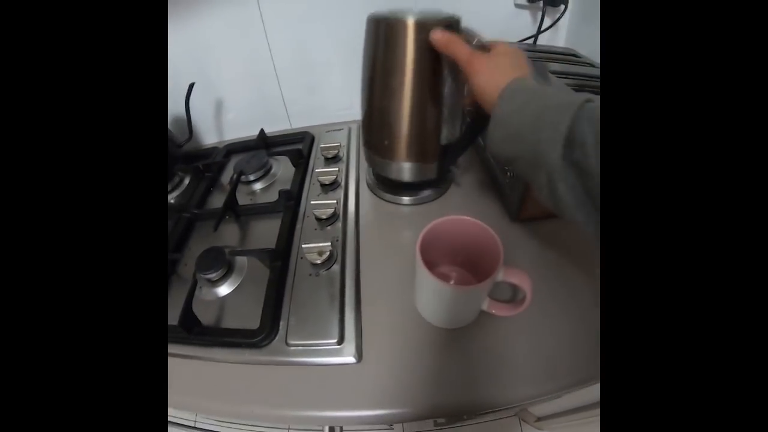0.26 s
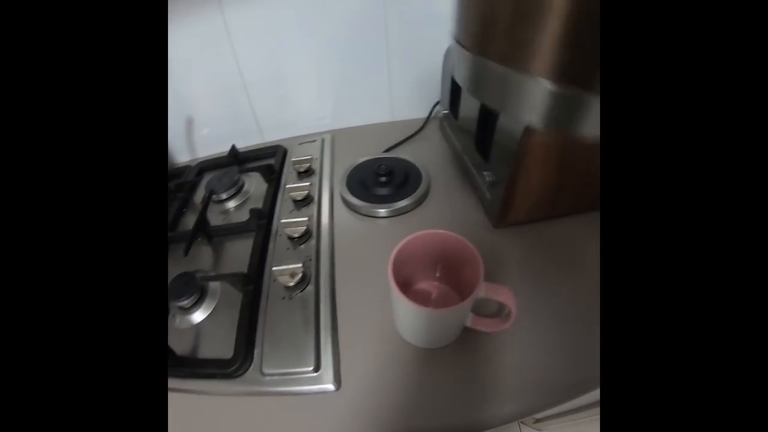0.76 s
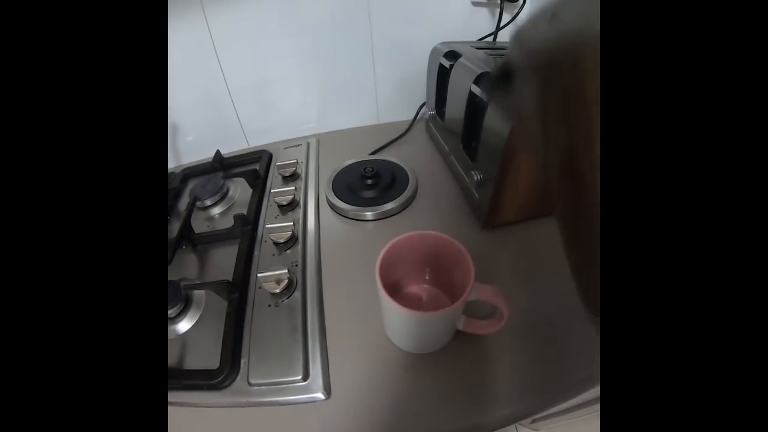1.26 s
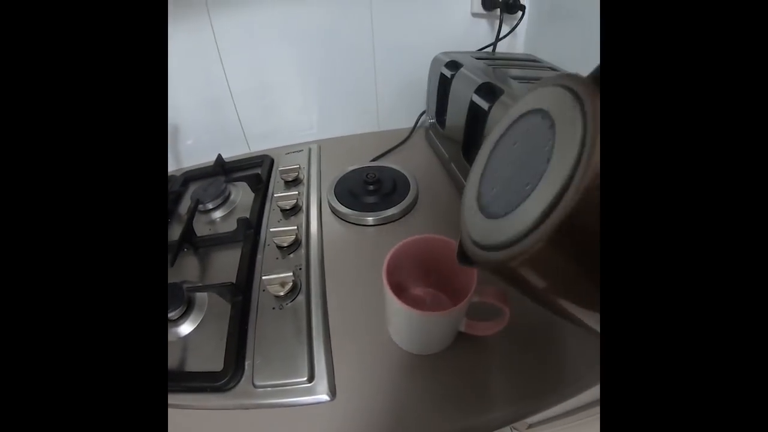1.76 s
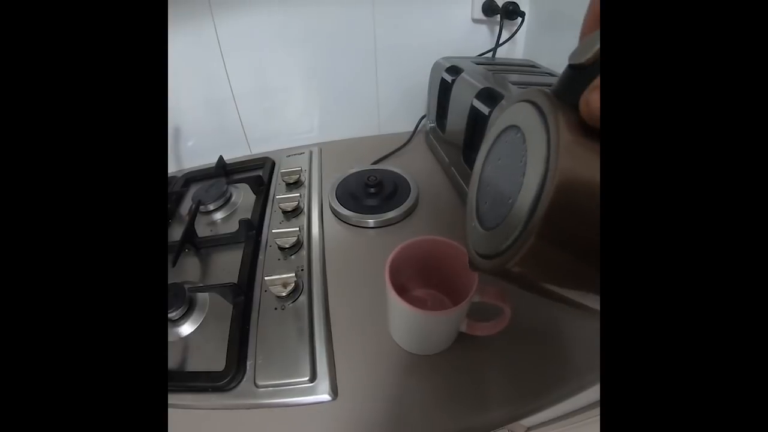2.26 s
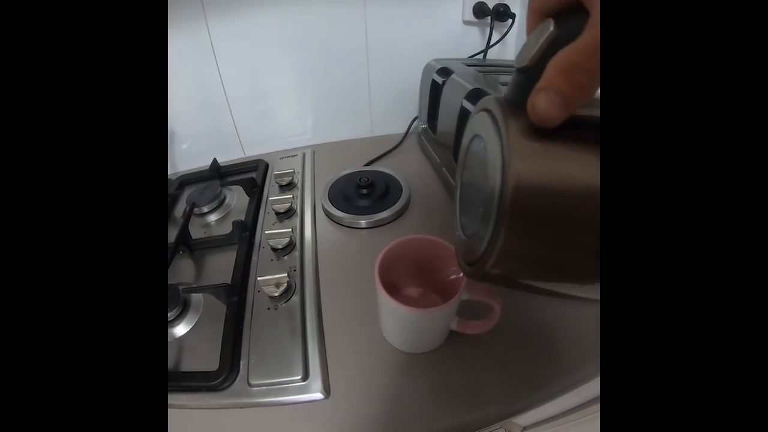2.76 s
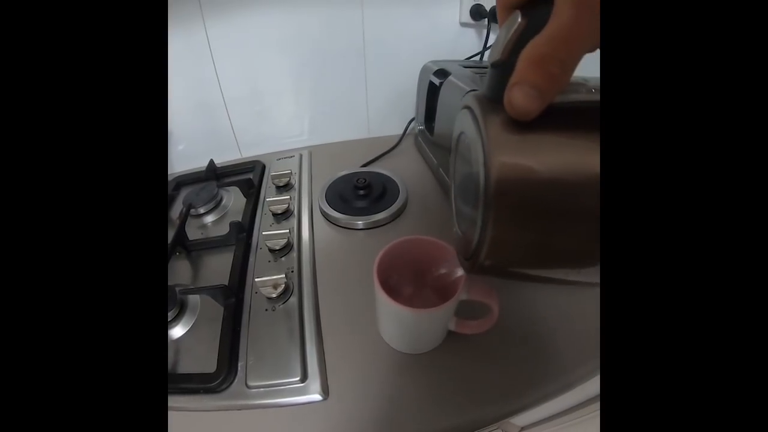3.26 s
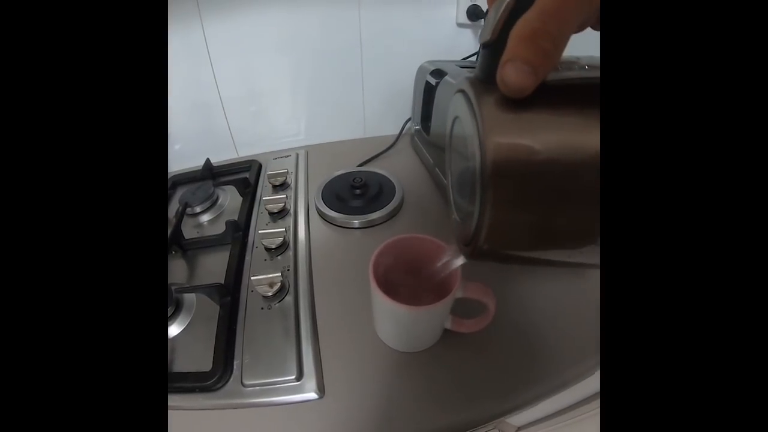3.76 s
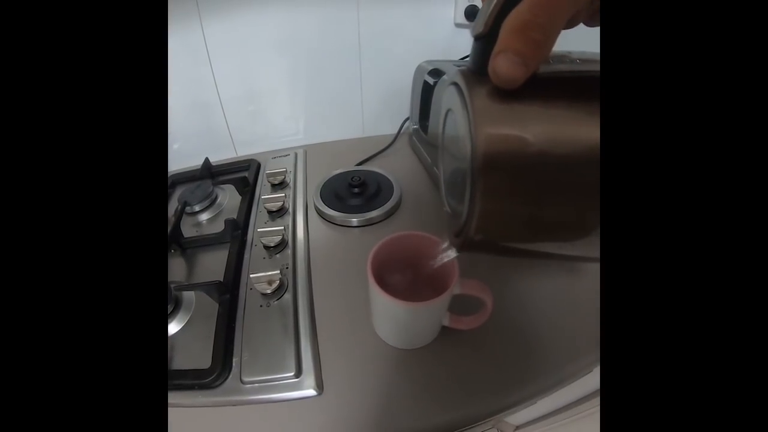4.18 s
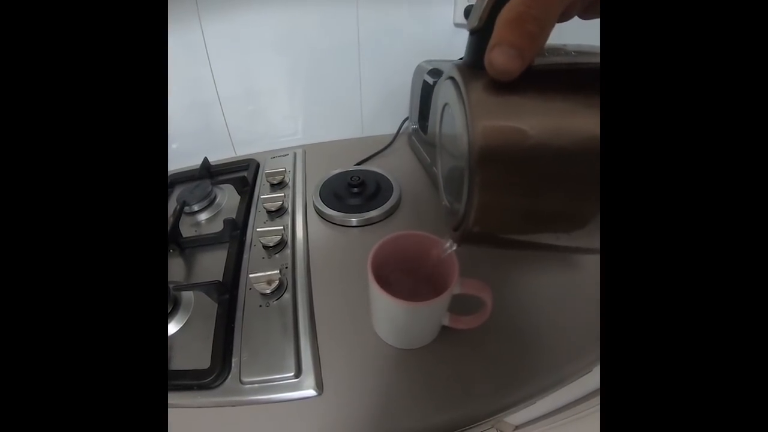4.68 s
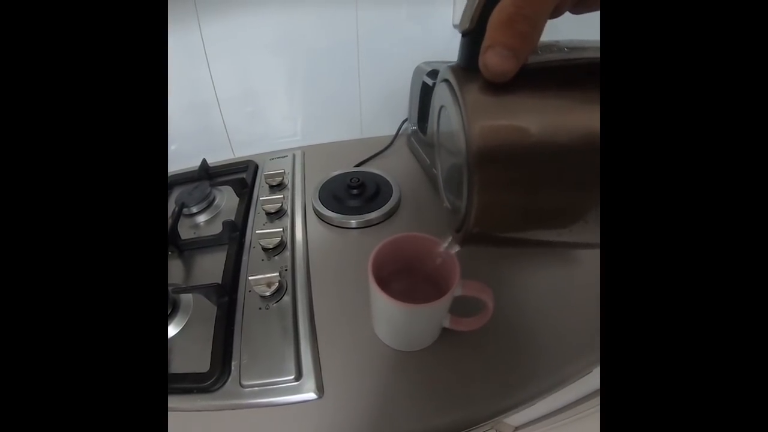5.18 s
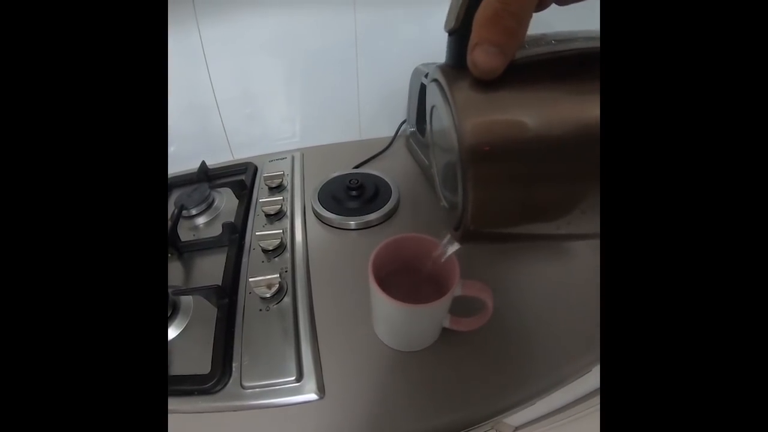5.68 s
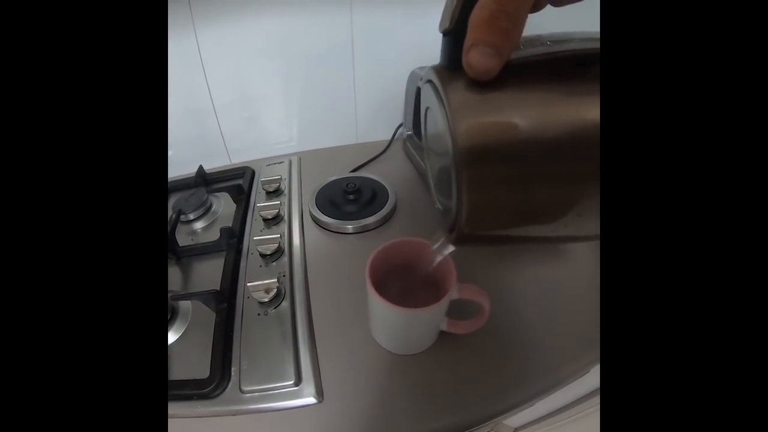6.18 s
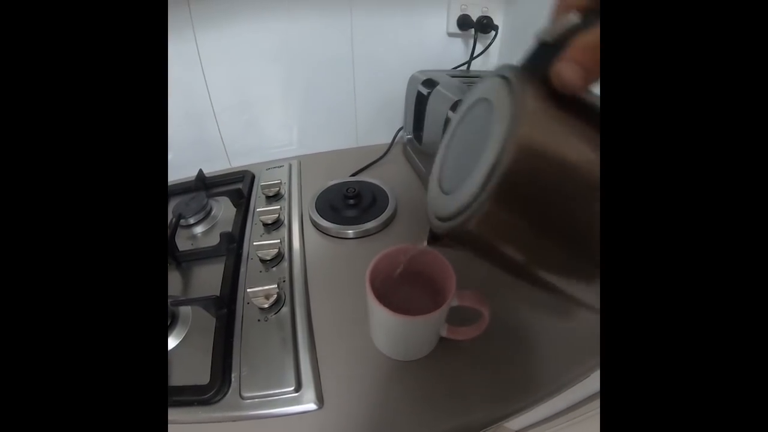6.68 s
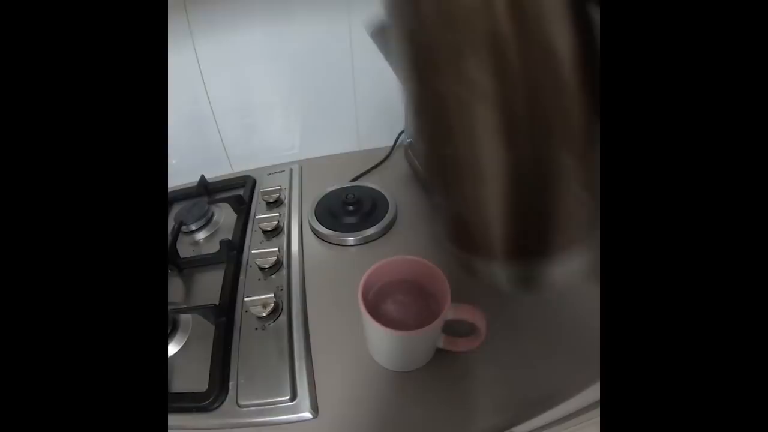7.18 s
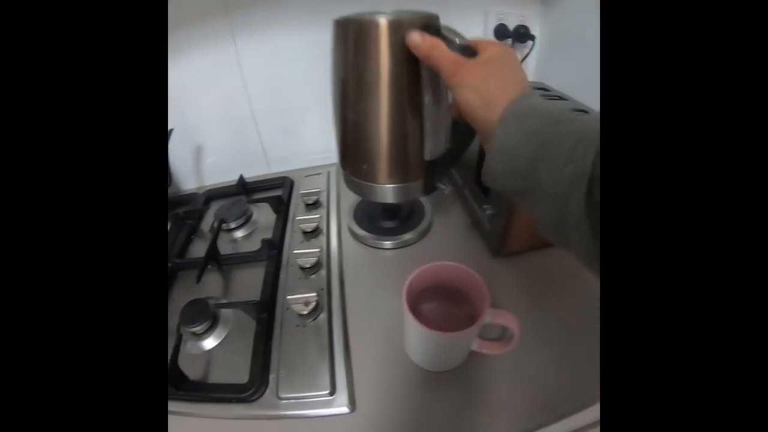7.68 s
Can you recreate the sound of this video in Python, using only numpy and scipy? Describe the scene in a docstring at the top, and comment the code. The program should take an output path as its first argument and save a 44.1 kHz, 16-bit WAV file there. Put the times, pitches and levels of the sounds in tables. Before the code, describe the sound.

Low boiling rumble and steamy hiss from a metal kettle, light clicks as it is lifted, a brighter hiss passing by, then fading. A thin stream hits a bare mug brightly, deepening into plops and glugs as it fills. Finally a hard clack and thud, ringing steel and a fresh surge of boiling. Close stereo pickup, small tiled kitchen, faint hum.

```python
"""First, close to the microphone, the rumble and hiss of a steel kettle just off the boil; lifted from its
base it clicks, and the boiling fades as it tips. Hot water trickles, plops and gulps into a ceramic mug.
Upright again, the water boils anew on the hot plate, and the kettle knocks against something at the worktop.
Boiling and splashes are built of random pops, damped bubble tones and filtered noise, the knock of ringing
modes; a small tiled kitchen answers pour and clicks, with air and a low hum behind."""
import sys
import numpy as np
from scipy import signal
from scipy.fft import rfft, irfft
from scipy.io import wavfile
from scipy.ndimage import uniform_filter1d, map_coordinates

SR = 44100
rng = np.random.default_rng(int(sys.argv[2]) if len(sys.argv) > 2 else 0)


def generate_wav(signal):
    """Clip the signal to [-1, 1] and save it as 16-bit WAV at the path in sys.argv[1]."""
    frames = np.transpose(np.atleast_2d(signal))
    scaled = np.clip(frames, -1, 1) * 32767
    pcm = np.round(scaled).astype(np.int16)
    wavfile.write(sys.argv[1], SR, pcm)


N = 349713

TOP_HZ = 11200  # upper limit of the microphone's band
LIFT_S, TILT_S, UPRIGHT_S = 0.28, 1.3, 7.22  # the kettle leaves its base, tips, stands upright
DEEP_S = 4.02  # the mug is past its shallow stage

# The boil dying down as the kettle tips: (time [s], rumble level [dB], hiss level [dB]), before trims
COOLING_BOIL = [(0, -33, -53), (0.35, -35, -50.5), (0.9, -36.5, -49), (1.3, -39.5, -47.5), (1.8, -47, -56),
                (2.4, -48.5, -60.5), (2.8, -60, -71), (3.05, -53.5, -77)]
# The boil flaring up as water runs back over the hot plate: (time [s], rumble level [dB], hiss level [dB])
RETURNING_BOIL = [(6.7, -62, -61), (6.9, -48, -61), (7.15, -38.5, -41.5), (7.42, -39, -45.5),
                  (7.62, -34, -41), (7.93, -32, -48)]
# Colour of the kettle's body sound: (frequency [Hz], relative density [dB per Hz])
BODY_COLOUR = [(45, -9.5), (62, 8), (90, 2.5), (190, -8), (230, -9.5), (280, 4), (360, -2), (430, -5),
               (560, -10.5), (900, -15), (1500, -78)]
# Colours of the hiss, first boil and second: (frequency [Hz], relative density [dB per Hz])
COOLING_HISS = [(530, -32), (900, -31), (1020, -5), (1500, -7), (1840, -7.5), (2730, -7), (5690, -19.5),
                (7590, -20), (10000, -24.5), (11500, -66)]
RETURNING_HISS = [(500, -2.5), (1000, -13.5), (2000, -6), (2900, -3), (3700, -11.5), (5000, -11.5),
                  (7500, -9.5), (10000, -18.5), (11500, -35)]
# Resonances of the steel wall: (frequency [Hz], width [Hz], relative level [dB])
WALL_MODES = [(1252, 95, 11), (1560, 140, 10), (2030, 110, 8), (2436, 59, 8.5), (3580, 380, 8),
              (4500, 49, 7.5)]
# Note of the hollow underside as the kettle is lifted and turned: (time [s], frequency [Hz])
HOLLOW_NOTE = [(0.3, 726), (0.4, 837.7), (0.52, 806.5), (0.901, 820), (1.6, 850.4), (7.699, 793.5)]
# Singing of the hot steel: (time [s], frequency [Hz])
SINGING_NOTE = [(1.27, 2287), (1.45, 2790), (1.8, 2676), (7.15, 2681), (7.7, 2773)]
# Filter on the hiss while the kettle is tilted: (frequency [Hz], gain [dB])
TILTED_COLOUR = [(900, -3.5), (1500, 2), (2500, -2.5), (3700, -2.5), (5500, 1)]
# Reference levels: the rumble's pitch and the singing rise and fall with the levels around them
REFERENCE_RUMBLE_DB, RUMBLE_HZ, RUMBLE_HZ_PER_DB = -36, 120.1, 0.5
REFERENCE_HISS_DB, SING_GROWS = -33.5, 1.5  # SING_GROWS: dB of singing per dB of hiss
BARE_DB = 13.5  # tilted, part of the hot steel lies bare and sings more
ON_BASE_DB = 5.5  # standing on its base, the kettle passes more body sound to the worktop
FLUTTER_DB = 1.3  # scale of the hiss's random flutter


def boiling(table, hiss_colour, wall_db, rumble_trim_db, hiss_trim_db, sing_trim_db, body_trim_db,
            hollow_trim_db):
    """Large steam bubbles rumble; countless small ones collapse and ring the steel wall."""
    rumble_db, hiss_db = curves(table)
    pitch = RUMBLE_HZ + RUMBLE_HZ_PER_DB * (rumble_db - REFERENCE_RUMBLE_DB)
    sing_surge_db, body_surge_db = surges()
    sing_db = REFERENCE_HISS_DB + SING_GROWS * (hiss_db - REFERENCE_HISS_DB)
    sing_db = sing_db + sing_surge_db + BARE_DB * tilted()
    body_db = hiss_db + body_surge_db + ON_BASE_DB * (1 - ramp(LIFT_S, OPEN_S))
    hollow_db = hiss_db + hollow_trim_db + underside_db()

    rumble = rumbling(table, pitch)  # the same on both sides
    body = spread(coloured(crackle_pair(3000, 3.06), BODY_COLOUR))
    hollow = gliding(crackle_pair(3000, 3.06), HOLLOW_NOTE, width_hz=85, steep=1.13)
    sing = gliding(crackle_pair(500, 5.0), SINGING_NOTE, width_hz=190, steep=1.5)

    def hiss_gain(hz):
        return amp(along(hiss_colour, hz)) * (1 + amp(wall_db) * peaks(WALL_MODES, hz))

    hiss = spread(filtered(crackle_pair(3000, 3.06), hiss_gain))
    hiss = reflected(hiss, echo_db=-7.0)
    recoloured = filtered(hiss, lambda hz: amp(along(TILTED_COLOUR, hz)))
    hiss = hiss + tilted() * (recoloured - hiss)

    fizz = amp(hiss_db + hiss_trim_db + FLUTTER_DB * wobble(22)) * hiss
    fizz = fizz + amp(sing_db + sing_trim_db) * sing
    low = amp(rumble_db + rumble_trim_db) * rumble + amp(body_db + body_trim_db) * body
    high = (amp(hollow_db) * hollow + fizz) * amp([[-.6], [.6]])  # slightly to the right
    return during(table, 0.59) * (low + high)


def rumbling(table, pitch):
    """Large steam bubbles swell and collapse at random, their loudness evened out over 1/6 s."""
    s, size = scatter(130, 2.9)
    active = (s > table[0][0] - .5) & (s < table[-1][0] + .5)
    s, size = s[active], size[active]
    hz = pitches(1.03 * pitch[(s * SR).astype(int)], 0.16, count=len(s))
    x = bubbles(s, size, hz, cycles=12.8, rise=0.028, onset=1.09)
    return x / np.sqrt(np.abs(uniform_filter1d(x ** 2, size=SR // 6)) + 1e-3)


# Water surging over the hot plate as the kettle tips and after the knock:
# (time of crest [s], length [s], singing gain [dB], body gain [dB])
PLATE_SURGES = [(1.444, 0.97, 4.5, 4), (7.703, 0.56, 22, -9)]


def surges():
    """What the surging water adds to the singing and to the body, in dB."""
    return sum(np.outer([sing_db, body_db], swell(s, length))
               for s, length, sing_db, body_db in PLATE_SURGES)


# Opening time, damping on the base, swell close above it and that swell's fading time
OPEN_S, COVERED_DB, GAP_DB, GAP_FADE_S = 0.066, -20, 14, 0.91


def underside_db():
    """The hollow underside is muffled on the base, loudest just above it, then settles."""
    since = np.maximum(np.arange(N) / SR - LIFT_S, 0)
    opened = ramp(LIFT_S, OPEN_S)
    return COVERED_DB * (1 - opened) + GAP_DB * opened * np.exp(-since / GAP_FADE_S)


def tilted():
    """1 while the kettle is tilted, 0 while it is upright, turning in 43 ms."""
    return ramp(TILT_S, 0.043) - ramp(UPRIGHT_S, 0.043)


def reflected(x, echo_db):
    """Worktop and tiles echo the moving kettle: their paths change and comb its hiss."""
    n = np.arange(N)
    lags = [(s + 0.000238 * wobble(2.5)) * SR for s in (.0012, .0031, .0058)]
    echoes = sum(np.array([np.interp(n - lag, n, side) for side in x]) for lag in lags)
    return unit(x + amp(echo_db) * echoes)


# Centre of the bright band as the kettle passes the microphone: (time [s], frequency [Hz])
PASSING_BAND = [(0.4, 3290), (1.05, 4670)]


def passing():
    """As the kettle rises past the microphone, a bright, grainy band of its hiss swells and climbs."""
    band = gliding(crackle_pair(900, 5.9), PASSING_BAND, width_hz=800, steep=1.5)
    return amp(-61.5) * swell(crest=0.95, length=0.53) * band


# Resonance of the plastic base: (frequency [Hz], width [Hz], relative level [dB])
BASE_MODES = [(425, 80, 2)]
# Its drone at the microphone: (time [s], level [dB])
BASE_DRONE = [(0, -45), (.25, -47), (.6, -49.5), (.9, -84)]


def base():
    """The plastic base drones with the boiling, as resonant noise, until the kettle is lifted clear."""
    drone = spread(filtered(rng.standard_normal((2, N)), lambda hz: peaks(BASE_MODES, hz) ** 1.9))
    return amp(curves(BASE_DRONE)[0]) * drone


# The pour: (time [s], patter level [dB], spray level [dB]), before trims
POUR_LEVELS = [(3.1, -93, -66), (3.3, -70.5, -57.5), (3.74, -54, -52), (3.9, -51, -51), (4.26, -55.5, -60),
               (4.58, -50, -64.5), (5.1, -57, -65), (5.85, -51, -59.5), (6.45, -56.5, -55),
               (6.95, -58.5, -52)]
# Colour of spray and ticks: (frequency [Hz], relative density [dB per Hz])
SPRAY_COLOUR = [(1350, -9.5), (2300, 4.5), (2990, -5), (3380, -8), (4240, -4), (5590, -10), (6710, -5),
                (8730, -12.5), (10300, -13), (11500, -59)]
# The gurgle's level at a steady patter, how closely it follows the patter, typical pitch
GURGLE_DB, STEADY_PATTER_DB, GURGLE_FOLLOWS, GURGLE_HZ = -54.5, -53.5, 0.46, 338
# While shallow, the mug gurgles less and tinkles more
SHALLOW_GURGLE_DB, SHALLOW_TINKLE_DB = -4.5, 22


def stream():
    """The running stream: splashes that tick and ring the mug, fine spray, tiny bubbles, soft gurgle."""
    patter_db, spray_db = curves(POUR_LEVELS)
    gurgle_db = GURGLE_DB + GURGLE_FOLLOWS * (patter_db - STEADY_PATTER_DB)
    gurgle_db = gurgle_db + SHALLOW_GURGLE_DB * (1 - ramp(DEEP_S, 0.12))
    # The stream thickens into a last glug as the kettle swings back
    gurgle_db = gurgle_db + 10.5 * swell(crest=6.68, length=0.2)

    s, size = scatter(240, 5.0)
    patter = unit(mug(s, size))
    impacts = np.bincount((s * SR).astype(int), size, N)[:N]
    ticks = unit(coloured(impacts, SPRAY_COLOUR))

    s, size = scatter(700, 3.5)
    hz = np.minimum(pitches(6040, 0.404, count=len(s)), TOP_HZ)
    droplets = bubbles(s, size, hz, cycles=31, rise=0.046, onset=0.59)
    spray = unit(coloured(droplets, SPRAY_COLOUR))

    s, size = scatter(140, 14.0)
    rise = rng.normal(0.12, 0.1, (len(s), 1))
    tinkle = unit(bubbles(s, size, pitches(2980, 0.19, count=len(s)), cycles=25, rise=rise, onset=2.8))

    s, size = scatter(130, 3.0)
    gurgle = unit(gulps(s, size, pitches(GURGLE_HZ, 0.29, count=len(s))))  # small craters overlap

    splashes = amp(1.34) * patter + amp(-27.5 + SHALLOW_TINKLE_DB * shallow()) * tinkle
    treble = amp(-3.0) * ticks + amp(0.5) * spray
    water = amp(patter_db) * splashes + amp(spray_db - 8.5) * treble + amp(gurgle_db) * gurgle
    return during(POUR_LEVELS, 0.039) * water


# Rising resonance of the mug as it fills: (time [s], frequency [Hz])
FILLING_NOTE = [(3.3, 840), (3.8, 1117), (4.2, 1165), (5.3, 1380), (6.0, 1460), (6.9, 1870)]
# Other resonances of the mug: (frequency [Hz], life [cycles], relative level [dB])
MUG_MODES = [(1220, 21, -6.5), (1670, 17, -0.5), (1940, 18, -7.5), (3340, 22, -0.5)]


def mug(s, size):
    """Each splash briefly rings the air in the mug; one note climbs with the water."""
    modes = [(np.interp(s, *np.transpose(FILLING_NOTE)), 15, 0)] + MUG_MODES
    ringing = np.zeros(N)
    for hz, cycles, db in modes:
        strength = size * amp(db) * rng.uniform(.2, 1, len(s))
        glide = rng.normal(0, 0.026, (len(s), 1))
        ringing += bubbles(s, strength, pitches(hz, 0.09, count=len(s)), cycles, rise=glide, onset=1.0)
    return ringing


# The loudest drops: (time [s], relative level [dB], bubble frequency [Hz], relative spatter level [dB])
LOUD_DROPS = [(3.0873, -54, 3100, -44), (3.135, -46, 3150, -63), (3.21, -42, 3280, -51),
              (3.255, -40, 3200, -53), (3.3465, -31.5, 1640, -52), (3.451, -35, 766, -48),
              (3.4996, -38, 1670, -48.5), (3.5186, -38, 1700, -52), (3.545, -26, 2980, -60),
              (3.5601, -26.5, 1700, -42), (3.5888, -27, 2630, -59), (3.644, -25.5, 2760, -63),
              (3.678, -22.5, 2880, -47), (3.706, -25.5, 950, -59), (3.717, -33, 2920, -52),
              (3.7774, -33, 2980, -64), (3.7977, -35, 1710, -44.5), (3.8336, -23.5, 995, -52),
              (3.8615, -28, 1000, -48), (3.8772, -27, 1670, -52), (3.8997, -28.5, 1050, -38),
              (3.9185, -40, 947, -41.5), (3.9414, -27.5, 1126, -59), (3.9867, -28, 3480, -38),
              (3.9993, -25, 1035, -41.5), (4.043, -32, 1140, -57), (4.077, -33.5, 1100, -44.5),
              (4.2042, -28, 1550, -49.5), (4.2604, -36, 1140, -49.5), (4.29, -36, 1110, -52),
              (4.3105, -27, 1140, -60), (4.3316, -29, 1200, -44.5), (4.417, -36, 1220, -69),
              (4.436, -25, 1160, -57), (4.5149, -28, 1650, -45.5), (4.5305, -20.5, 1200, -51),
              (4.598, -29.5, 3330, -73), (4.638, -34, 3400, -65), (4.7051, -27.5, 1230, -72),
              (4.7141, -25, 1200, -68), (4.732, -27.5, 1680, -67), (4.733, -26.5, 3600, -61),
              (4.7613, -35, 1220, -51), (4.9029, -30, 1240, -44), (4.98, -46, 1660, -54),
              (5.01, -39, 1200, -52.5), (5.045, -34, 1180, -59), (5.081, -30, 1190, -73),
              (5.1022, -30, 1700, -66), (5.1767, -31, 1650, -50), (5.278, -35.5, 1280, -49.5),
              (5.302, -31, 1250, -62), (5.358, -34.5, 1250, -62), (5.4006, -34, 1310, -46),
              (5.419, -28.5, 1270, -45.5), (5.4523, -25, 3320, -45), (5.4948, -24, 1420, -54),
              (5.509, -36, 1550, -53), (5.536, -40, 1620, -49), (5.5415, -39, 3370, -48),
              (5.5772, -34, 1440, -55), (5.587, -42, 3380, -48), (5.66, -33, 1550, -72),
              (5.6836, -25.5, 1580, -68), (5.723, -28.5, 1590, -55), (5.732, -34, 1650, -62),
              (5.769, -32, 1660, -56), (5.7966, -25, 1630, -65), (5.808, -34, 1700, -68),
              (5.823, -30, 1650, -58), (5.91, -26, 1570, -47), (5.94, -32, 1650, -51),
              (5.967, -37, 1690, -46.5), (6.0084, -31, 1670, -56), (6.031, -32, 1680, -58),
              (6.045, -30, 1700, -50), (6.078, -26, 1600, -50), (6.107, -26, 1650, -48.5),
              (6.1517, -22, 1770, -37), (6.2244, -32, 1640, -49), (6.2449, -42, 1630, -51),
              (6.2695, -20, 1690, -48), (6.4838, -29.5, 1670, -48), (6.5006, -23.5, 1670, -51),
              (6.646, -29.5, 1680, -68), (6.6783, -32, 1660, -63), (6.6927, -35, 1660, -45.5),
              (6.747, -33.5, 1740, -54), (6.7743, -33, 1700, -52), (6.786, -33, 1800, -48),
              (6.8072, -32.5, 1900, -49), (6.877, -36, 1640, -46)]
# Colour of their spatter: (frequency [Hz], relative density [dB per Hz])
SPATTER_COLOUR = [(1500, -3.5), (2400, -1), (3400, 11.5), (4800, 0.5), (6700, 1), (9000, -7.5),
                  (10500, -19), (11500, -20)]
# Ring of the ceramic, damped as the mug fills
RIM_HZ, RIM_DB, RIM_DAMPING_DB_PER_S = 3160, -5, 35


def drops():
    """Drops snap on the water, spatter and trap gliding bubbles."""
    s, db, hz, spatter_db = np.transpose(LOUD_DROPS)
    snap = bubbles(s, amp(db - 3.5), hz, cycles=5.8, rise=0.073, onset=1.07)
    glide = rng.normal(0.024, 0.093, (len(s), 1))
    plinks = bubbles(s, amp(db - 11), hz, cycles=35, rise=glide, onset=1.94)
    rebound_s = s + rng.uniform(0.00201, 0.013, len(s))
    rebound = mug(rebound_s, amp(db - 13.5))  # thrown-up water falls back
    rim_db = spatter_db + RIM_DB - RIM_DAMPING_DB_PER_S * (s - s[0])
    rim = bubbles(s, amp(rim_db), np.full(len(s), RIM_HZ), cycles=260, rise=0, onset=1)
    impact = bursts(s, spatter_db + 8.0, t60=0.0042, attack=0.00022)
    scattering = bursts(s, spatter_db + 0.5, t60=0.014, attack=0.0011)
    return snap + plinks + rebound + rim + coloured(impact + scattering, SPATTER_COLOUR)


# Gulps of the craters that heavy drops leave: (time [s], relative level [dB], frequency [Hz])
CRATERS = [(3.999, -39, 290), (4.078, -42, 435), (4.2894, -36, 447), (4.3315, -29, 435), (4.436, -35, 310),
           (4.53, -35, 285), (4.714, -35, 304), (4.7607, -42, 310), (4.9024, -37.5, 426),
           (5.081, -37.5, 420), (5.1758, -45, 377), (5.418, -39, 296), (5.4525, -37, 304),
           (5.4946, -28.5, 282), (5.659, -37.5, 298), (5.8688, -36, 400), (6.0105, -41, 416),
           (6.0781, -37, 295), (6.107, -34, 282), (6.152, -38, 254), (6.6197, -41, 428), (6.6462, -38, 286),
           (6.6776, -31.5, 332), (6.6923, -40, 253)]
# Delay of a gulp's crest, half width, time in which its note falls
GULP_DELAY_S, GULP_WIDTH_S, GULP_FALL_S = 0.00844, 0.0041, 0.0079  # the last two are typical values


def heavy_gulps():
    """The deepest craters stand out from the gurgle and push a low plop through the water."""
    s, db, hz = np.transpose(CRATERS)
    plop_hz = np.full(len(s), 165)
    plop = bubbles(s + GULP_DELAY_S / 2, amp(db - 13), plop_hz, cycles=10, rise=0, onset=.5)
    return gulps(s, amp(db), hz) + plop


def gulps(s, size, hz):
    """A drop's crater widens, so its note falls while it swells and closes; no two are alike."""
    t = np.arange(SR // 30) / SR
    since = t - GULP_DELAY_S
    variation = rng.uniform(-1.01, 1, (2, len(s), 1)) * np.reshape([0.4, 0.8], (2, 1, 1))
    width, fall = np.exp(variation)
    fall_s = GULP_FALL_S * fall
    turns = hz[:, None] * fall_s * (1 - np.exp(-since / fall_s)) + rng.random((len(s), 1))
    shape = np.exp(-(since / (GULP_WIDTH_S * width)) ** 2)
    return placed(s, size[:, None] * np.sin(2 * np.pi * turns) * shape)


# Colour of the stream breaking up on the bare bottom: (frequency [Hz], relative density [dB per Hz])
WASH_COLOUR = [(700, -25), (1600, -2), (3000, 5), (4200, -7), (6500, -4), (11000, -29)]
WASH_DB, WASH_NOTE_DB = -3.5, -4.5  # froth over the spray, mug's note over the patter


def wash():
    """On the bare bottom the stream breaks up into a dense wash, which sounds the mug's rising note."""
    patter_db, spray_db = curves(POUR_LEVELS)
    froth = unit(coloured(crackle(700, 6), WASH_COLOUR))
    note = gliding(crackle_pair(1000, 2.3), FILLING_NOTE, width_hz=720, steep=1.9)[0]
    both = amp(spray_db + WASH_DB) * froth + amp(patter_db + WASH_NOTE_DB) * note
    return during(POUR_LEVELS, 0.078) * shallow() * both


def first_trickle():
    """Light droplets keep the bare ceramic ringing until the water covers it."""
    ring = unit(filtered(crackle(45, 3.0), lambda hz: peaks([(RIM_HZ, 80, 0)], hz) ** 1.5))
    return amp(-62) * ramp(LOUD_DROPS[0][0], 0.14) * shallow() * ring


def shallow():
    """1 while the stream still hits the bottom of the mug, 0 once the water is deep."""
    return 1 - ramp(DEEP_S - 0.097, 0.097)


# Filter of the pour in deep water: (frequency [Hz], gain [dB])
DEEP_WATER = [(105, -4), (150, 6), (215, -1), (290, 2.5), (355, -3), (435, 4), (530, -4.5), (650, 4),
              (860, -6), (1200, 0), (5000, -1), (8800, 2)]


def deepened(x):
    """Deep water gives the pour a fuller body and a hollow just under the mug's note."""
    deep = filtered(x, lambda hz: amp(along(DEEP_WATER, hz)))
    return deep + shallow() * (x - deep)


# The kettle knocking and rocking: (time [s], relative thud level [dB], relative clack level [dB])
KNOCK_HITS = [(7.231, -11.5, -8), (7.247, -6.5, -20.5), (7.253, -33, -15.5), (7.261, -20, -26),
              (7.274, -20, -29), (7.294, -24, -35.5)]
# Colour of the clack: (frequency [Hz], relative density [dB per Hz])
CLACK_COLOUR = [(60, -5), (280, 4.5), (450, -3.5), (1000, -3.5), (1700, -2.5), (2700, -2.5), (3700, -6.5),
                (4700, -10.5), (8000, -15), (10300, -23), (11500, -60)]
# Steel ringing after the knock: (frequency [Hz], relative level [dB], decay by 60 dB [s], swell [s])
STEEL_RING = [(474.5, 3.5, 0.3, 0.11), (614, -3, 0.25, 0.093), (304, -23.5, 0.6, 0.014),
              (397, -27.5, 0.95, 0.019), (828, -24.5, 0.37, 0.025), (1253, -9.5, 0.19, 0.054)]


def knock():
    """The kettle knocks with a thud, crashes as it rocks, and its steel rings on."""
    s, thud_db, clack_db = np.transpose(KNOCK_HITS)
    thud = bubbles(s, amp(thud_db - 2.0), np.full(len(s), 128.), cycles=7.3, rise=-0.08, onset=0.12)

    def crash():
        clatter = bursts(s, clack_db - 8.5, t60=0.079, attack=0.0014)
        return clatter + bursts(s, clack_db - 20.0, t60=0.5, attack=0.0026)

    clack = widen(coloured(np.array([crash(), crash()]), CLACK_COLOUR))
    start = int(s[0] * SR)
    t, ring = np.arange(N - start) / SR, np.zeros((2, N))
    for hz, db, t60, swell_s in STEEL_RING:
        slosh = 0.7 * wobble(45)[start:]
        phase = 2 * np.pi * hz * t + slosh  # sloshing water bends the pitch
        # Each mode reaches the two sides out of step
        lead = np.array([[1], [-1]]) * rng.choice([-1, 1]) * np.arctan(amp(along(SIDE_LEVEL, hz)))
        beating_db = 2 * wobble(30)[start:]
        level = amp(db + beating_db - 60 * t / t60) * (1 - np.exp(-(t / swell_s) ** 2))
        ring[:, start:] += level * np.sin(phase + lead)
    return thud + clack + amp(-3.5) * ring * amp([[-1], [1]])  # the ring leans to the right


# Light clicks of base and handle: (time [s], relative tick level [dB], relative body level [dB])
LIGHT_CLICKS = [(0.297, -36.5, -26.5), (0.324, -28.5, -29), (1.066, -28.5, -40), (1.184, -39, -55),
                (7.591, -25, -44)]
# Colour of the ticks: (frequency [Hz], relative density [dB per Hz])
TICK_COLOUR = [(700, -21), (1400, 1), (2500, 10.5), (3600, -4.5), (6000, -5.5), (10000, -14), (12000, -59)]
# Resonance of their body: (frequency [Hz], width [Hz], relative level [dB])
CLICK_MODES = [(720, 330, 0)]


def clicks():
    """The hollow base clicks as the kettle leaves it, and the handle ticks under the weight."""
    s, tick_db, body_db = np.transpose(LIGHT_CLICKS)
    tick = coloured(bursts(s, tick_db - 5.0, t60=0.04, attack=0.00046), TICK_COLOUR)
    puffs = bursts(s, body_db - 5.0, t60=0.012, attack=0.0008)
    return tick + filtered(puffs, lambda hz: unit(peaks(CLICK_MODES, hz) ** 1.24))


# Decay of the small tiled kitchen: (frequency [Hz], decay by 60 dB [s])
ROOM_DECAY = [(100, 0.32), (300, 0.46), (1000, 0.28), (4000, 0.13), (10000, 0.52)]


def kitchen(x, wet_db):
    """Direct sound plus the tiled room's answer, each frequency dying at its own speed."""
    hz, t, z = signal.stft(rng.standard_normal((2, SR // 2)), SR, nperseg=256)
    decay = amp(-60 * t / along(ROOM_DECAY, hz)[:, None])
    decay = decay + 2.26 * amp(-60 * t / 0.014)  # near walls answer first
    tail = spread(signal.istft(z * decay, SR, nperseg=256)[1])[:, :SR // 2]
    delayed = np.pad(x, (SR // 400, 0))[None]
    answer = signal.fftconvolve(delayed, tail / np.linalg.norm(tail[0]), axes=1)[:, :N]
    return x + amp(wet_db) * answer


# Tones of the appliance's hum, and a faint high tone at 1227 Hz: (frequency [Hz], relative level [dB])
HUM_TONES = [(49.5, -50), (101, -58.5), (300.5, -56.5), (1227, -70)]
# Course of the hum: (time [s], gain [dB])
HUM_COURSE = [(0, 1), (1.5, 1), (3.2, -4), (4.2, -8), (5.5, -21), (6.5, -9), (7.93, -2.5)]
# Colour of the room air: (frequency [Hz], relative density [dB per Hz])
AIR_COLOUR = [(22, -1.5), (50, -11), (100, -0.5), (210, -7), (290, 2.5), (400, -8), (600, -14),
              (1200, -18.5), (3000, -32), (6000, -37), (11000, -49.5)]


def background():
    """Quiet room air, an appliance's wavering hum, a faint high tone and faint low noise at each microphone
    port."""
    t = np.arange(N) / SR
    hum = np.zeros(N)
    for hz, db in HUM_TONES:
        level = amp(db - 0.5 + 3.0 * wobble(6.08)) * np.sqrt(2)
        hum += level * np.sin(2 * np.pi * hz * t + 0.92 * wobble(5.115))
    air = spread(coloured(rng.standard_normal((2, N)), AIR_COLOUR))
    port_colour = [(30, -9), (120, -15), (400, 7.5), (1500, -33)]  # (frequency [Hz], density [dB per Hz])
    ports = unit(coloured(rng.standard_normal((2, N)), port_colour))
    return amp(curves(HUM_COURSE)[0]) * hum + amp(-55.0) * air + amp(-66.5) * ports


def bubbles(s, size, hz, cycles, rise, onset):
    """Damped sines swell over onset cycles, die 60 dB in so many cycles and glide by rise in pitch."""
    t = np.arange(int(SR * cycles / np.min(hz))) / SR
    turns = hz[:, None] * t
    shape = amp(-60 * turns / cycles) * (1 - np.exp(-(turns / onset) ** 2))
    tone = np.sin(2 * np.pi * turns * (1 + rise * turns / cycles))
    return placed(s, size[:, None] * shape / shape.max() * tone)


def placed(s, waves):
    """Adds up one short wave per moment."""
    at = (s[:, None] * SR).astype(int) + np.arange(waves.shape[1])
    return np.bincount(at.ravel(), waves.ravel(), N)[:N]


def bursts(s, db, t60, attack):
    """A short puff of noise at each moment."""
    t, level = np.arange(SR // 2) / SR, np.zeros(N + SR)
    puff = amp(-60 * t / t60) * (1 - np.exp(-(t / attack) ** 2))
    for start, size in zip(s, amp(db)):
        level[int(start * SR):][:len(t)] += size * puff / puff.max()
    return level[:N] * rng.standard_normal(N)


def pitches(centre_hz, scatter_share, count):
    """Bubbles of many sizes around a typical pitch."""
    return centre_hz * np.exp(scatter_share * np.clip(rng.standard_normal(count), -2, 2))


def scatter(rate, spread_db):
    """Random moments, rate a second, with random sizes, mostly small and none outsized."""
    draw = rng.random((int(rate * N / SR), 2))
    size = amp(-spread_db * np.log(np.maximum(draw[:, 1], np.exp(-3))))
    return draw[:, 0] * N / SR, size


def crackle(rate, spread_db):
    """A train of tiny pops."""
    s, size = scatter(rate, spread_db)
    return np.bincount((s * SR).astype(int), size * rng.choice([-1, 1], len(s)), N)[:N]


def crackle_pair(rate, spread_db):
    """Two unrelated trains of pops."""
    return np.array([crackle(rate, spread_db) for _ in range(2)])


def gliding(pair, track, width_hz, steep):
    """A pair through one resonance, replayed at varying speed so that it follows a (s, Hz) track."""
    pitch, = curves(track)
    ring = filtered(pair, lambda hz: peaks([(pitch.max(), width_hz, 0)], hz) ** steep)
    place = np.cumsum(pitch / pitch.max())
    return spread(np.array([np.interp(place, np.arange(N), side) for side in ring]))


# Side against mid at the stereo microphone: (frequency [Hz], level [dB])
SIDE_LEVEL = [(60, -62), (130, -60), (200, -56), (340, -28), (620, -2), (1100, -2.5), (2000, -5),
              (3500, -18.5), (6300, -6.5), (9000, 2)]


def widen(pair):
    """Two unrelated signals become left and right: one in the bass, apart in the treble."""
    mid, side = pair[0], filtered(pair[1], lambda hz: amp(along(SIDE_LEVEL, hz)))
    return np.array([mid + side, mid - side])


def spread(pair):
    """A widened pair whose middle has rms 1."""
    return widen(pair) / np.sqrt(np.mean(pair[0] ** 2))


def filtered(x, gain, size=16384):
    """x through the causal minimum-phase filter with this gain of frequency."""
    cepstrum = irfft(np.log(np.maximum(gain(np.fft.rfftfreq(size, 1 / SR)), 1e-6)))
    cepstrum[1:size // 2] *= 2
    cepstrum[size // 2 + 1:] = 0
    response = irfft(np.exp(rfft(cepstrum)))[:size // 2]
    return signal.oaconvolve(x, response if x.ndim == 1 else response[None], axes=-1)[..., :x.shape[-1]]


def coloured(x, spectrum):
    """x with a spectrum, white noise keeping its power."""
    return filtered(x, lambda hz: unit(amp(along(spectrum, hz))))


def peaks(modes, hz):
    """Gain of a set of (Hz, width Hz, dB) resonances."""
    return np.sqrt(sum(amp(db) ** 2 / (1 + ((hz * hz - c * c) / (hz * w + 1)) ** 2) for c, w, db in modes))


def along(points, hz):
    """(Hz, value) points on a log axis."""
    f, v = np.transpose(points)
    return np.interp(np.log(hz + 1), np.log(f), v)


def curves(rows):
    """One value per sample for each column after the time."""
    s, *cols = np.transpose(rows)
    return [np.interp(np.arange(N) / SR, s, c) for c in cols]


def during(rows, fade):
    """1 while a table lasts, fading out on either side."""
    first, last = rows[0][0], rows[-1][0]
    return np.interp(np.arange(N) / SR, [first - fade, first, last, last + fade], [0, 1, 1, 0])


def ramp(start, length):
    """Rises from 0 to 1 over length seconds."""
    return np.clip((np.arange(N) / SR - start) / length, 0, 1)


def swell(crest, length):
    """A smooth rise to 1 and fall, about length seconds wide."""
    return np.exp(-(2 * (np.arange(N) / SR - crest) / length) ** 2)


def wobble(rate):
    """A smooth random curve, rate knots a second."""
    steps = np.linspace(0, N * rate / SR, N // 100)
    smooth = map_coordinates(rng.standard_normal(int(steps[-1]) + 4), [steps])
    return np.interp(np.arange(N) * rate / SR, steps, smooth)


def unit(x):
    """Scale to rms 1."""
    return x / np.sqrt(np.mean(x ** 2) + 1e-20)


def amp(db):
    """Decibels to gain."""
    return 10 ** (np.asarray(db) / 20)


def scene():
    """Kettle and mug close to the microphone, which drifts so that the mug moves slightly to the right."""
    cooling = boiling(COOLING_BOIL, COOLING_HISS, wall_db=-9.0, rumble_trim_db=0.0, hiss_trim_db=0.5,
                      sing_trim_db=-14.5, body_trim_db=3.5, hollow_trim_db=-8.5)
    reheating = boiling(RETURNING_BOIL, RETURNING_HISS, wall_db=6.0, rumble_trim_db=3.5, hiss_trim_db=1.5,
                        sing_trim_db=-14.0, body_trim_db=-4.5, hollow_trim_db=-10.0)
    kettle = cooling + passing() + base() + reheating
    water = deepened(stream() + wash() + first_trickle() + drops() + heavy_gulps())
    pan_db = np.array([[-1], [1]]) * ramp(POUR_LEVELS[0][0], 2.3)
    pour = kitchen(water, wet_db=-0.5) * amp(pan_db)
    return kettle + pour + knock() + kitchen(clicks(), wet_db=3.0) + background()


def record(dry):
    """The microphone keeps next to nothing above its band limit: a steep low-pass without phase shift."""
    return signal.sosfiltfilt(signal.butter(12, TOP_HZ, fs=SR, output="sos"), dry)


dry = scene()
out = record(dry)
generate_wav(out)
```